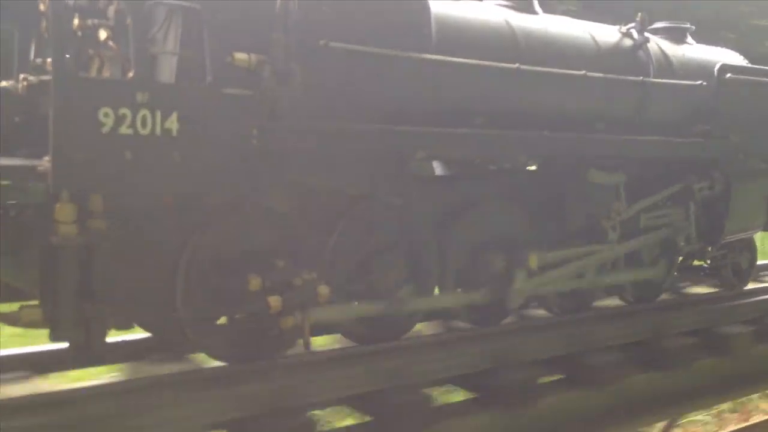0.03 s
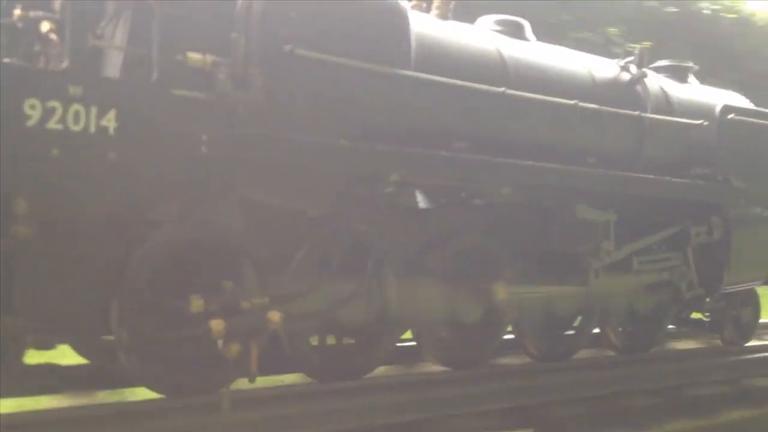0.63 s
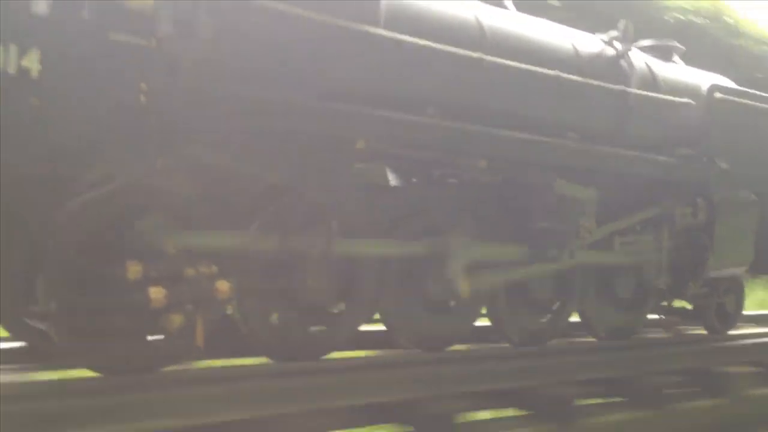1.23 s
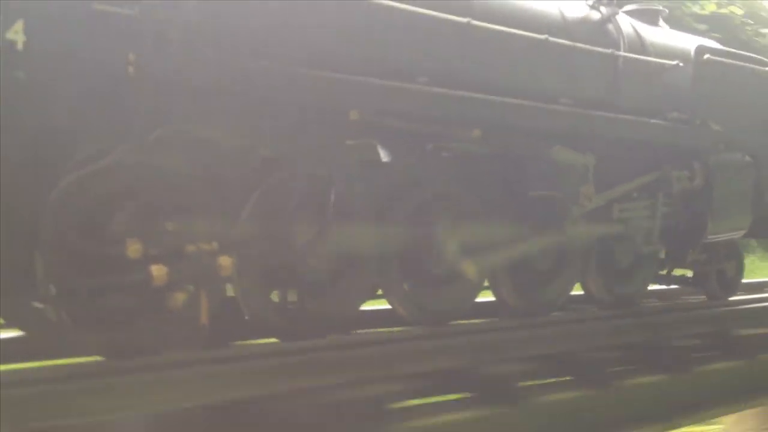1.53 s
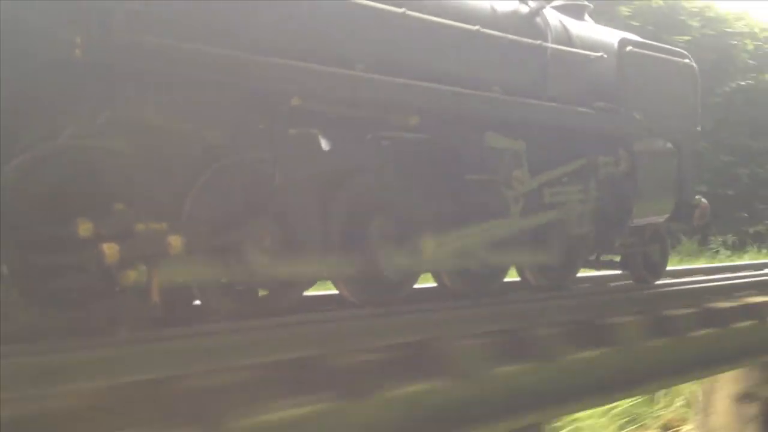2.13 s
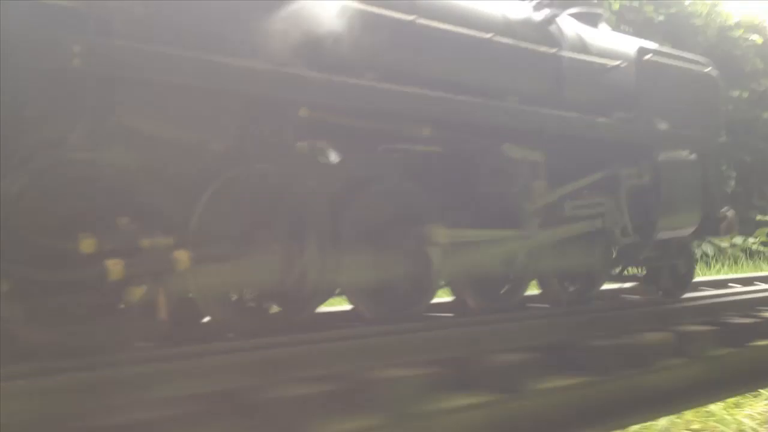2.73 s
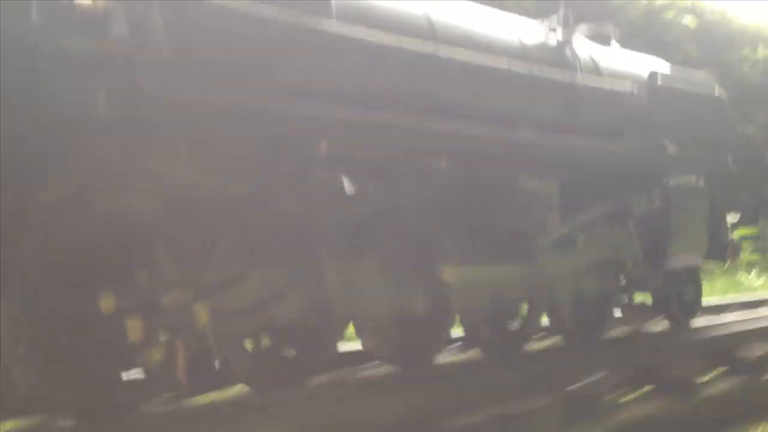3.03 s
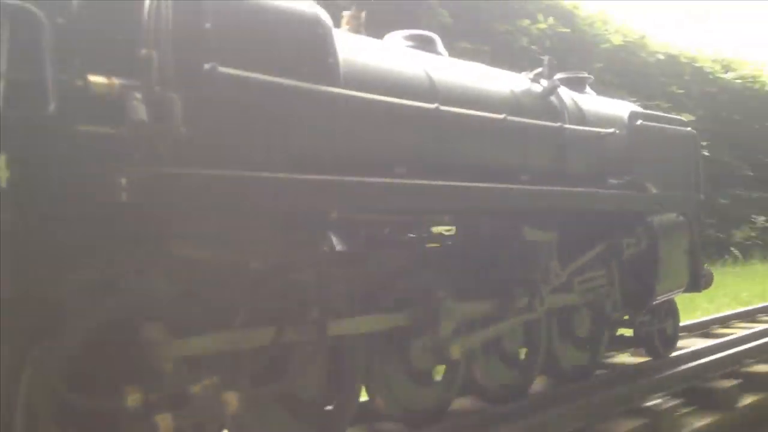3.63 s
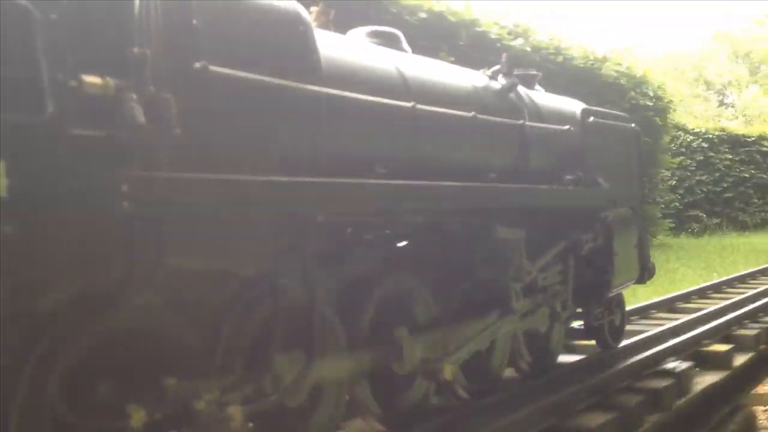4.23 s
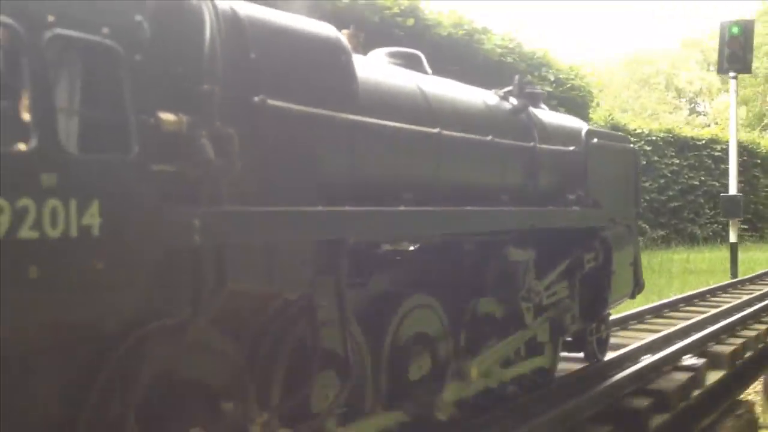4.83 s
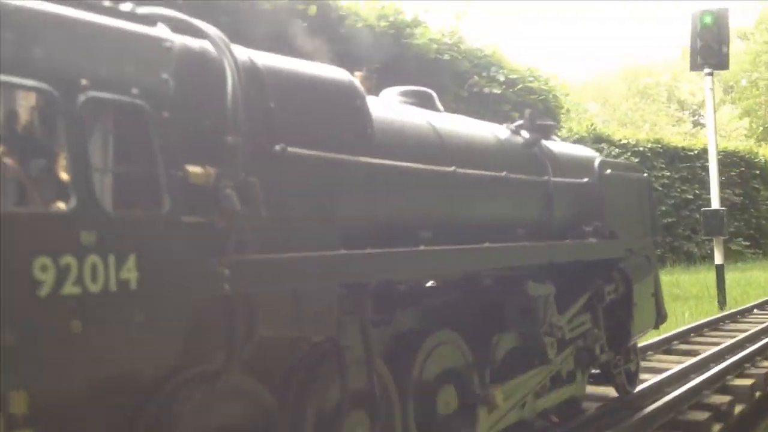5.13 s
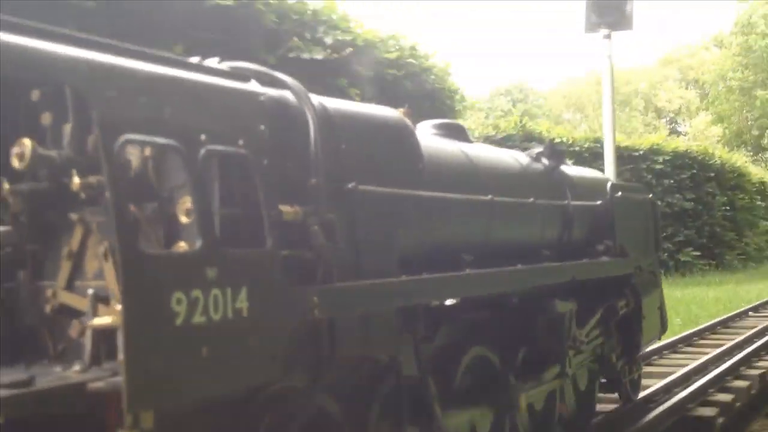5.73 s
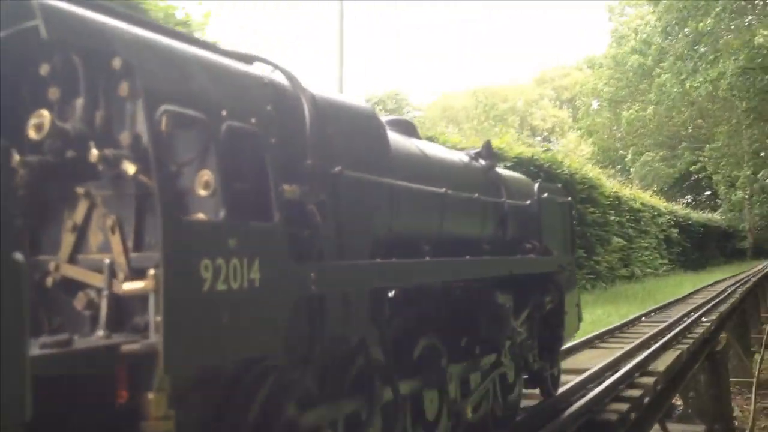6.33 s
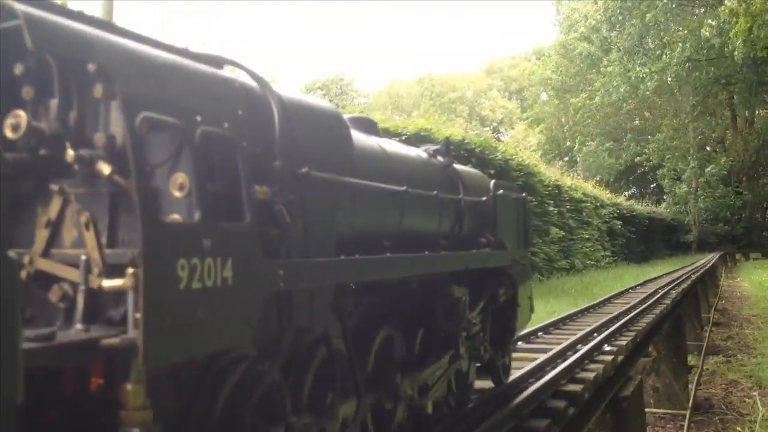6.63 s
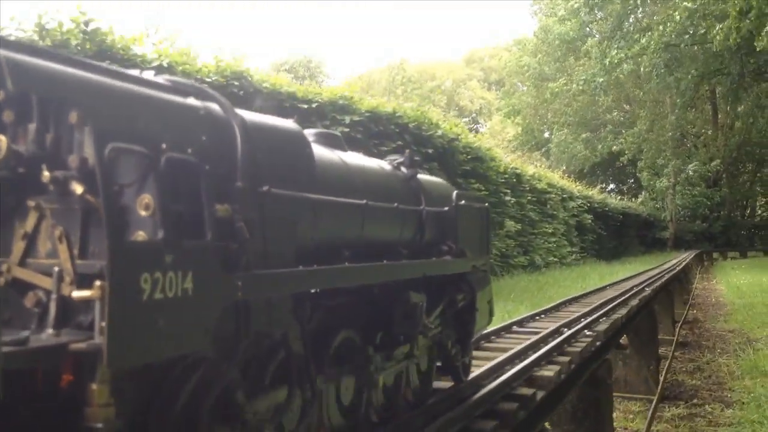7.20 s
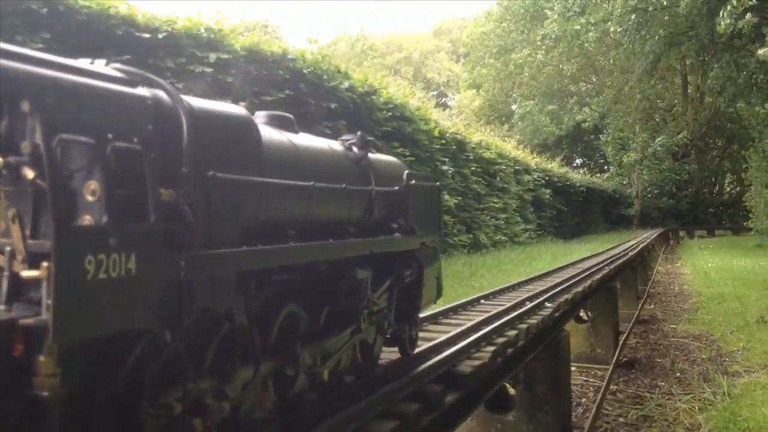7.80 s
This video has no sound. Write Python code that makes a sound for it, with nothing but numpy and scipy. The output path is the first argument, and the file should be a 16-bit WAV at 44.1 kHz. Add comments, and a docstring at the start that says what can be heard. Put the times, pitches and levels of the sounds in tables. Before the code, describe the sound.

Steady rushing rumble and steam hiss of a small train at speed, with rapid light ticking, bumps and a closing clatter.

```python
"""A miniature steam locomotive runs at speed on a raised steel track in a garden, heard from a car
riding alongside. From the start, rough contact makes the wheels roar and rasp and the beams boom, steam
hisses in four quick beats a turn, the rods tick in their pins, and bumps jolt the rumbling car.
Midway the listener falls behind the cab. Near seven seconds a hollow span groans and the rolling eases;
at the end the wheels clatter over a rough stretch."""
import sys
import numpy as np
from scipy import signal
from scipy.fft import rfft, irfft, next_fast_len
from scipy.io import wavfile

SR = 44100
rng = np.random.default_rng(int(sys.argv[2]) if len(sys.argv) > 2 else 0)


def output_pcm(signal):
    """Save a mono or channel-first signal as 16-bit PCM at the path in sys.argv[1].

    Samples are clipped to [-1, 1] before scaling.
    """
    pcm = np.clip(np.atleast_2d(signal).T, -1, 1) * 32767
    wavfile.write(sys.argv[1], SR, np.round(pcm).astype(np.int16))


N = 355446
TIME = np.arange(N) / SR

# Strength of the rolling contact, which also scales steam and rattle: time_s, level_db
ROLLING_DRIVE = [(0, -24), (0.3, -25), (0.57, -25), (0.64, -22.5), (0.84, -22), (0.9, -25.5), (1.02, -26.0),
                 (1.3, -23.5), (1.62, -23), (1.75, -22), (2.12, -22), (2.24, -23), (2.7, -22), (3.0, -23),
                 (3.33, -23.5), (3.5, -24), (3.9, -23), (4.3, -23), (4.45, -22), (4.75, -23), (5.0, -22.5),
                 (5.38, -22.5), (5.53, -24), (5.9, -23), (6.06, -23), (6.25, -22.5), (6.6, -24),
                 (6.87, -23), (6.91, -28), (6.97, -30.5), (7.27, -27), (7.36, -28.5), (7.52, -28.5),
                 (7.6, -25), (7.75, -24), (7.81, -26), (7.88, -24.5), (7.93, -29), (8.06, -29.5)]
# Response of the track relative to that drive: time_s, rails_db, beams_db
TRACK_RESPONSE = [(0, 0, -7.5), (.8, -0.5, -11), (1.3, -2.1, -13.5), (2.1, -2.5, -12.5), (2.75, 0, -15.5),
                  (3.35, -1, -11.5), (3.48, -2.5, -15), (3.7, -0.5, -10), (4.55, -3.5, -14),
                  (4.8, -4.5, -9), (5.4, -1, -13), (5.99, -2, -9.5), (6.04, -7.5, -10.5), (6.23, -7.5, -10),
                  (6.3, -5, -11), (6.67, -2, -7), (6.95, -3.5, -1.5), (7.3, -5, -10), (7.75, -2, -11.5),
                  (7.9, -4, -8), (8.06, 0, -4)]
# Rough patches of rail: time_s, surge_db
ROUGH_PATCHES = [(1.76, 1.5), (2.08, 0.5), (2.6, 0), (2.78, 0.5), (3.05, 2), (3.33, 0.5), (4.3, 1.5),
                 (4.58, 3.5), (5.86, 3), (6.28, 3), (6.84, 0)]
# Spectra of the rails, the wheels and the beams: frequency_hz, density_db
ROAR_SPECTRUM = [(60, -55), (200, -27.5), (380, -16), (520, -9), (620, -23), (800, -4), (950, -1),
                 (1100, -1.5), (1220, -1), (1340, 0), (1520, -1.5), (1750, -13.5), (2300, -16),
                 (5000, -34.5)]
RASP_SPECTRUM = [(100, -37), (900, -44), (1550, -4), (1800, -1.5), (2100, 0.5), (2600, -1), (3200, -4),
                 (3650, -5.5), (4000, -6), (4400, -9.5), (5000, -8.5), (6000, -23.5), (9000, -38)]
BOOM_SPECTRUM = [(60, -96), (250, -22), (450, -15), (550, -9.5), (640, -1.5), (750, 0.5), (900, -10),
                 (1200, -17), (2500, -34.5)]
def rolling_noise():
    """Forced vibration: roughness drives rails, wheels and beams; one bouncing load modulates all."""
    roar_db, rasp_db, boom_db, patch_s = -1, -1.54, 0.5, 0.044
    rails_db, beams_db = in_time(TRACK_RESPONSE)
    surge_db = sum(db * np.exp(-((TIME - s) / patch_s) ** 2) for s, db in ROUGH_PATCHES)
    drive_db = in_time(ROLLING_DRIVE)[0] + lift_before_knocks_db()
    load = drift(68)
    pings = .25 * clatter(count=1900, t60_s=.095, spread_db=6)
    roar = contact_noise(grains_per_s=1500, grit=0.45, spread_db=3) + pings
    roar *= from_db(drive_db + surge_db + rails_db + roar_db + 0.26 * load)
    rasp = contact_noise(grains_per_s=2500, grit=0.42, spread_db=7) + pings
    rasp *= from_db(drive_db + 0.36 * surge_db + rasp_db + 1.05 * load)
    boom = rng.standard_normal(N) * from_db(drive_db + beams_db + boom_db + 2.66 * load)
    return colour(roar, ROAR_SPECTRUM) + colour(rasp, RASP_SPECTRUM) + colour(boom, BOOM_SPECTRUM)


# Steam hiss relative to the rolling: time_s, level_db
STEAM_LEVEL = [(0, -5.5), (0.8, -7), (1.7, -8), (2.1, -8), (2.8, -8), (3.35, -6.5), (3.58, -9.5),
               (3.9, -6.5), (4.3, -8.5), (4.7, -7.5), (5.05, -7.5), (5.42, -6), (5.5, -11), (5.62, -5.5),
               (6.1, -8), (6.4, -7.5), (7.0, -7.5), (7.4, -7), (8.06, -6)]
# Brief spurts of steam: peak_s, boost_db
STEAM_SPURTS = [(.8, 1.5), (2.11, 1.5), (4.27, 3), (7.3, 2.5)]
# Water drops in the steam: start_s, level_db
WATER_SPITS = [(0.055, -14), (0.175, -23), (0.636, -22), (2.204, -22), (2.694, -20), (3.880, -20),
               (4.299, -20), (4.384, -22), (4.613, -22), (4.758, -20), (5.400, -22), (5.601, -26),
               (5.865, -21), (6.012, -24), (6.073, -24), (6.125, -24), (6.179, -21), (7.659, -19),
               (7.701, -19)]
# Spectra of the hiss and of any sharp spit, tap or crack: frequency_hz, density_db
HISS_SPECTRUM = [(100, -49), (2000, -6.5), (4000, 1), (5000, 4.5), (5800, 2), (7000, 2), (7700, 1.5),
                 (8500, -3), (9300, -11.5), (10100, -14), (11000, -13.5), (12500, -14.5), (14200, -20)]
SNAP_SPECTRUM = [(500, -35), (4000, -2), (8000, -23), (10000, -1), (14000, 1)]
def steam(turns):
    """Jet noise: wet hiss, amplitude-modulated by four exhaust beats a turn, with spitting drops."""
    (rolling_db,), (steam_db,) = in_time(ROLLING_DRIVE), in_time(STEAM_LEVEL)
    hiss_db, spit_db, spits_per_s = 0.68, 11, 9
    beat_db = .6 * np.cos(2 * np.pi * 4 * turns)
    spurts_db = sum(db * swell(s, s, rise_s=0.071, t60_s=0.48) for s, db in STEAM_SPURTS)
    flow = from_db(rolling_db + steam_db + hiss_db + spurts_db + beat_db + 1.38 * drift(45))
    spits = flow * (rng.random(N) < spits_per_s / SR) * rng.uniform(3, 5.5, N)
    for s, db in WATER_SPITS:
        spits[round(s * SR)] += from_db(db + spit_db)
    hiss = contact_noise(grains_per_s=2300, grit=0.42, spread_db=10) * flow
    return colour(hiss, HISS_SPECTRUM) + colour(spits, SNAP_SPECTRUM)


# Points of each turn where the rods take up their play: phase_turns, relative_db
ROD_BACKLASH = [(0, 0), (.26, -11), (.52, -6.5)]
# Strength of the regular ticks: time_s, level_db
TICK_LEVEL = [(0, -28.5), (1.1, -29), (2.5, -30), (3.4, -28.5), (4.6, -30.5), (6.3, -33), (8.06, -38)]
# Harder clinks: start_s, level_db, pitch_hz
ROD_CLINKS = [(0.767, -31, 11430), (1.540, -31, 11170), (1.708, -33, 11540), (1.758, -30, 11450),
              (2.052, -29.5, 11100), (2.281, -24, 11100), (2.600, -22, 10960), (2.809, -25, 11260),
              (3.101, -24, 11060), (3.326, -29, 11000), (4.056, -24, 11120), (4.793, -24, 11110),
              (5.131, -31, 11280), (5.212, -30, 11320), (6.467, -27, 10930), (7.123, -29, 11300)]
# Modes of a rod: pitch_ratio, level_db, t60_s
ROD_MODES = [(1, -2, 0.027), (.975, -14, 0.02), (1.04, -8, .022)]
def rods(turns):
    """Backlash: the rods strike their pins each turn, giving a snap and a short, high modal ring."""
    tick_hz, pitch_scatter = 10830, 0.014   # the pitch varies a little from tap to tap
    level_db, = in_time(TICK_LEVEL)
    taps = [(round(s * SR), db, hz) for s, db, hz in ROD_CLINKS]
    for phase, db in ROD_BACKLASH:
        for at in np.flatnonzero(np.diff(np.floor(turns - phase))):
            tap_db = level_db[at] + db + 2.4 * rng.normal()
            taps.append((at, tap_db, tick_hz * (1 + pitch_scatter * rng.normal())))
    snaps, rings = np.zeros((2, N))
    t = TIME[:SR // 20]
    for at, tap_db, hz in taps:
        snaps[at] += from_db(tap_db)
        for ratio, db, t60_s in ROD_MODES:
            ping = from_db(-60 * t / t60_s) * np.sin(2 * np.pi * hz * ratio * t)
            rings[at:at + len(t)] += from_db(tap_db + db - 4.5 + 2 * rng.normal()) * ping[:N - at]
    return colour(snaps, SNAP_SPECTRUM) + rings


# Wheels landing on the rail: start_s, level_db, relative_body_db
WHEEL_KNOCKS = [(0.587, -23, -3), (1.160, -27, -8), (1.497, -28, -6), (1.751, -23, -3), (1.982, -23, -3),
                (2.099, -26, 0), (3.436, -29, -6), (4.260, -22, -4), (4.686, -29, -2), (4.792, -21, -5),
                (4.846, -22, 0), (4.957, -23, -5), (5.340, -23, -4), (5.477, -19, -1), (6.178, -26, -8),
                (6.732, -22, -3), (6.847, -26.5, 14), (6.921, -41, 0), (7.783, -18.5, 2), (7.830, -19, 3),
                (7.837, -24, -4), (7.854, -22, -3), (7.878, -22, -8), (7.901, -19.5, 1), (7.948, -20.5, 0),
                (7.953, -27, 1), (7.984, -27, -7)]
# Spectra of a knock's bright part and dull body: frequency_hz, density_db
BRIGHT_SPECTRUM = [(100, -38), (900, -24), (1700, 1), (2600, 3.5), (5000, 3), (8000, -1), (10000, -14),
                   (14000, -15)]
DULL_SPECTRUM = [(100, -51), (350, 0), (900, 4), (1600, 0.5), (3000, -16), (9000, -45)]
def wheel_knocks():
    """Impact and rebound: steel lands on steel with a crack, a brief burst and a longer crunch."""
    rebound_s, rebound_db = 0.0035, -16
    impact_db, crunch_db, dull_db, crack_db = 3.5, -4, -3.5, -3
    blows, bodies = np.zeros((2, N))
    for s, db, body_db in WHEEL_KNOCKS:
        at = [round(s * SR), round((s + rebound_s * rng.uniform(.8, 1.2)) * SR)]
        blows[at] = from_db([db, db + rebound_db])
        bodies[at] = blows[at] * from_db(dull_db + body_db)
    impact = from_db(impact_db) * decay([blows, bodies], t60_s=0.0096)
    crunch = from_db(crunch_db) * decay([blows, bodies], t60_s=0.034)
    bright, dull = (impact + crunch) * rng.standard_normal((2, N))
    crack = from_db(crack_db) * colour(blows, SNAP_SPECTRUM)
    return colour(bright, BRIGHT_SPECTRUM) + colour(dull, DULL_SPECTRUM) + crack


def lift_before_knocks_db(lift_db=0.1, lead_s=0.015):
    """Amplitude modulation: the rolling rises very slightly before a knock, more for a harder one."""
    hardest_db = max(db for _, db, _ in WHEEL_KNOCKS)
    return lift_db * sum(from_db(db - hardest_db) * np.exp(-((TIME - s + lead_s) / lead_s) ** 2)
                         for s, db, _ in WHEEL_KNOCKS)


# Brief rings of wheels and track: peak_s, pitch_hz, level_db, t60_s
TRACK_RINGS = [(0.019, 523, -24, 0.2), (.415, 1027, -18.5, 0.085), (.755, 1110, -22, .08),
               (1.773, 1340, -20, 0.055), (1.971, 1620, -23, 0.081), (2.062, 1270, -20, .09),
               (2.108, 1370, -17, 0.082), (2.587, 1116, -19, 0.12), (2.622, 2700, -24, .06),
               (2.690, 1420, -18, 0.075), (2.772, 927, -19, .07), (2.792, 1506, -17.5, .09),
               (2.961, 2620, -23, .07), (3.208, 2160, -20.5, .07), (3.336, 1507, -23, .06),
               (3.362, 1114, -20, 0.09), (4.156, 1960, -20.5, 0.075), (4.352, 2770, -24, .07),
               (4.569, 860, -23, 0.068), (6.275, 1295, -20, 0.09), (6.492, 3000, -26, .07),
               (6.510, 1180, -20.5, 0.077), (6.795, 644, -15, 0.11), (6.855, 804, -18, 0.11),
               (6.862, 2780, -22.5, 0.076), (6.872, 1717, -19, 0.14), (6.878, 670, -14.5, 0.13),
               (6.713, 920, -22, .06), (6.927, 1420, -25, .06), (6.955, 845, -24, .06),
               (7.049, 2220, -25, 0.054), (7.155, 2370, -32, .1), (7.217, 2220, -22, 0.053),
               (7.292, 2650, -25, .08), (7.762, 2320, -21.5, 0.073), (7.84, 847, -27, 0.17),
               (7.903, 860, -23, 0.15)]
def track_rings(rise_s=.006):
    """Damped resonance: a moment of rubbing builds up a mode, which wavers and dies away."""
    out, waver = np.zeros(N), 0.75 * drift(49)
    for s, hz, db, t60_s in TRACK_RINGS:
        near = slice(max(0, int((s - .05) * SR)), int((s + .25) * SR))
        t = TIME[near] - s
        envelope = np.where(t < 0, np.exp(-(t / rise_s) ** 2), from_db(-60 * np.abs(t) / t60_s))
        tone = np.sin(2 * np.pi * (hz * t + rng.random()) + waver[near])
        out[near] += np.sqrt(2) * from_db(db) * envelope * tone
    return out


# Hollow spans of track: start_s, end_s, pitch_hz, bandwidth_hz, level_db
HOLLOW_SPANS = [(6.77, 6.803, 727, 237, -19), (6.843, 6.875, 715, 250, -20.5),
                (7.845, 7.925, 860, 160, -27.5)]
def span_groans():
    """Broad resonance: a hollow span groans as the wheels run onto it and dies away behind them."""
    out = np.zeros(N)
    for start, end, hz, width, db in HOLLOW_SPANS:
        band = signal.butter(3, [hz - width / 2, hz + width / 2], "band", fs=SR, output="sos")
        groan = rms_one(signal.sosfilt(band, rng.standard_normal(N)))
        out += from_db(db) * swell(start, end, rise_s=0.032, t60_s=0.3) * groan
    return out


# Held bands of noise: start_s, end_s, centre_hz, bandwidth_hz, level_db
HELD_BANDS = [(0.2, 0.39, 510, 57, -33), (1, 3.1, 1055, 340, -30), (4, 5.85, 674, 140, -34),
              (6, 6.3, 2380, 340, -28.5), (4.798, 5.05, 4900, 1400, -33.5), (5.0, 7.5, 6950, 300, -48),
              (6.05, 6.6, 6930, 220, -44), (7, 7.5, 415, 100, -43.5), (7, 8.6, 2320, 210, -37),
              (-1, 0.12, 2480, 230, -29.5), (3, 3.6, 2250, 570, -30), (4, 4.36, 2500, 740, -27)]
def swells_and_whines(fade_s=.12):
    """Band-limited noise: broad swells in the roar and rasp, and a few faint, narrow whines."""
    out = np.zeros(N)
    for start, end, hz, width, db in HELD_BANDS:
        fade = np.clip(np.minimum(TIME - start, end - TIME) / fade_s + 1, 0, 1)
        out += from_db(db) * fade * resonance(hz, width)
    return out


# The riding car between jolts: time_s, rumble_db, drone_db
CAR_RIDE = [(0, -45.5, -44.5), (2.6, -43.5, -60), (3.3, -51, -53.5), (4.1, -50.5, -46), (4.9, -46.5, -43.5),
            (6.4, -46, -48), (7.1, -52, -48.5), (8.06, -49, -49)]
# Bumps in the track: peak_s, thud_db, ring_db
CAR_JOLTS = [(0.02, -29.5, -34), (.36, -33, -37), (0.439, -32, -53), (0.65, -34.5, -37), (1.26, -34.5, -46),
             (1.9, -38, -43), (2.619, -41, -53), (3.01, -56, -40), (3.099, -58, -43), (4.229, -42, -38),
             (4.55, -56, -37), (4.86, -57, -39), (4.977, -51, -36), (5.385, -52, -32), (5.6, -44, -34),
             (5.7, -32, -54), (6.51, -40, -41), (7.38, -39, -45), (7.789, -55, -33.5), (7.91, -53, -37)]
# Modes of the car body: pitch_hz, bandwidth_hz, level_db
CAR_MODES = [(238, 18.4, -2), (293, 33, -3.5), (361, 55, -9)]
# Spectrum of the rumble: frequency_hz, density_db
RUMBLE_SPECTRUM = [(20, -19), (55, -30), (80, -16), (105, -10.5), (135, -0.5), (165, 3.5), (200, 0.5),
                   (300, -4.5), (450, -6.5), (900, -27.5)]
def riding_car():
    """Structure-borne sound: the car rumbles and drones; each jolt rings its floor and body."""
    floor_hz, floor_db, pitch_scatter = 159.6, -13.5, 0.023
    shake, drone_gain = from_db(in_time(CAR_RIDE))
    rings = np.zeros(N)
    for s, thud_db, ring_db in CAR_JOLTS:
        jolt = swell(s, s, rise_s=0.022, t60_s=0.23)
        shake = np.hypot(shake, from_db(thud_db) * jolt)   # the powers add
        near = np.abs(TIME - s) < .5
        modes = [(floor_hz, thud_db + floor_db)] + [(hz, ring_db + db) for hz, _, db in CAR_MODES]
        for hz, db in modes:
            pitch_hz = hz * (1 + pitch_scatter * rng.normal())
            tone = np.sin(2 * np.pi * (pitch_hz * (TIME[near] - s) + rng.random()))
            rings[near] += np.sqrt(2) * from_db(db) * jolt[near] * tone
    rumble = colour(rng.standard_normal(N) * shake * from_db(2.4 * drift(11)), RUMBLE_SPECTRUM)
    drone = rms_one(sum(from_db(db) * resonance(hz, width) for hz, width, db in CAR_MODES))
    return rumble + drone_gain * drone + rings


def loose_fittings(relative_db=-13.5):
    """Contact rattle: shaken by the rolling, loose fittings jingle in uneven bursts."""
    rolling_db, = in_time(ROLLING_DRIVE)
    jingle = clatter(count=420, t60_s=0.082, spread_db=6.5)
    return jingle * from_db(rolling_db + relative_db + 2 * drift(8))


def contact_noise(grains_per_s, grit, spread_db):
    """Shot noise: sparse grains of uneven size over a fine Gaussian roughness; rms 1."""
    sizes = from_db(spread_db * np.minimum(rng.exponential(1, N), 4)) * rng.choice([-1, 1], N)
    grains = rms_one(sizes * (rng.random(N) < grains_per_s / SR))
    return rms_one(rng.standard_normal(N) + grit * grains)


def clatter(count, t60_s, spread_db):
    """Impulse responses: small blows at random times each ring one mode of the metalwork; rms 1."""
    out, t = np.zeros(N), TIME[:SR // 8]
    envelope = from_db(-60 * t / t60_s)
    for when, pitch, size in rng.random((count, 3)):
        at, hz = int(when * N), 600 + 4000 * pitch
        ping = from_db(spread_db * size) * envelope * np.sin(2 * np.pi * hz * t)
        out[at:at + len(t)] += ping[:N - at]
    return rms_one(out)


def resonance(hz, width_hz):
    """Band-pass noise from two equal resonators in cascade; rms 1."""
    r = np.exp(-np.pi * width_hz * np.sqrt(2) / SR)
    section = [1 - r, 0, r - 1, 1, -2 * r * np.cos(2 * np.pi * hz / SR), r * r]
    return rms_one(signal.sosfilt([section, section], rng.standard_normal(N)))


def colour(x, spectrum):
    """Minimum-phase filter with the given spectral shape; white noise keeps its power."""
    size = 2 * next_fast_len(N // 2 + SR // 10)
    hz, db = np.transpose(spectrum)
    log_hz = np.log(np.fft.rfftfreq(size, 1 / SR) + 1)
    gain = rms_one(from_db(np.interp(log_hz, np.log(hz), db)))
    cepstrum = irfft(np.log(gain)) * (1 + np.sign(np.fft.fftfreq(size)))
    return irfft(rfft(x, size) * np.exp(rfft(cepstrum)))[:N]


def drift(rate_hz):
    """Low-pass noise: a smooth random fluctuation of rms about 1."""
    step, settle = 40, 2000
    r = np.exp(-2 * np.pi * rate_hz * step / SR)
    noise = rng.standard_normal(N // step + settle + 2)
    slow = signal.lfilter([1], [1, -2 * r, r * r], noise)[settle:]
    return np.interp(np.arange(N) / step, np.arange(len(slow)), rms_one(slow))


def swell(start, end, rise_s, t60_s):
    """Envelope: a Gaussian rise to 1 at start, a hold until end, then exponential decay."""
    early, late = np.maximum(start - TIME, 0), np.maximum(TIME - end, 0)
    return np.exp(-np.minimum((early / rise_s) ** 2 + np.log(1000) * late / t60_s, 30))


def decay(impulses, t60_s):
    """Leaky integration gives each impulse an exponential tail."""
    return signal.lfilter([1], [1, -from_db(-60 / (t60_s * SR))], np.asarray(impulses) + 1e-18)


def in_time(rows):
    """Linear interpolation of each column to every sample."""
    times, *columns = np.transpose(rows)
    return [np.interp(TIME, times, column) for column in columns]


def from_db(db):
    """Decibels to amplitude ratio."""
    return 10 ** (np.asarray(db) / 20)


def rms_one(x):
    """Normalisation to rms 1."""
    return x / np.sqrt(np.mean(x ** 2) + 1e-20)


# Rotation of the driving wheels: time_s, angle_turns
WHEEL_TURNS = [(0, .31), (.278, 3), (1.522, 15), (2.254, 22), (3.094, 30), (4.558, 44), (5.809, 56),
               (6.335, 61), (8.06, 77.45)]
# Place of the listener: time_s, behind_fraction (0 beside the boiler, 1 behind the cab)
LISTENER_PLACE = [(0, 0), (3.4, 0.13), (4.6, 0.55), (5.8, 1), (7.2, 0.6), (8.06, .6)]
# Colouring of the running noise behind the cab: frequency_hz, gain_db
CAB_RESPONSE = [(1500, 0.5), (2300, 0), (2650, 0), (3250, -1), (3850, 0.5), (4250, -2.5), (4750, -1),
                (5600, -.5), (6300, 2.5), (7200, 2), (8200, -1.5), (9200, 2), (11000, 0)]
def scene():
    """Superposition in open air: all sources travel with the listener, the same in both ears."""
    turns, = in_time(WHEEL_TURNS)
    behind, = in_time(LISTENER_PLACE)
    running = rolling_noise() + loose_fittings() + steam(turns)
    running = (1 - behind) * running + behind * colour(running, CAB_RESPONSE)
    mono = running + span_groans() + track_rings() + swells_and_whines()
    mono += rods(turns) + wheel_knocks() + riding_car()
    return np.stack([mono, mono])


def record(dry):
    """Soft saturation rounds the highest peaks; band limiting cuts the deep bass and the top."""
    ceiling, low_cut_hz, high_cut_hz = .5, 80, 14150
    rounded = dry / (1 + (dry / ceiling) ** 6) ** (1 / 6)
    thin = signal.sosfilt(signal.butter(2, low_cut_hz, "high", fs=SR, output="sos"), rounded)
    return signal.sosfilt(signal.ellip(14, .1, 90, high_cut_hz, fs=SR, output="sos"), thin)


dry = scene()
out = record(dry)
output_pcm(out)
```